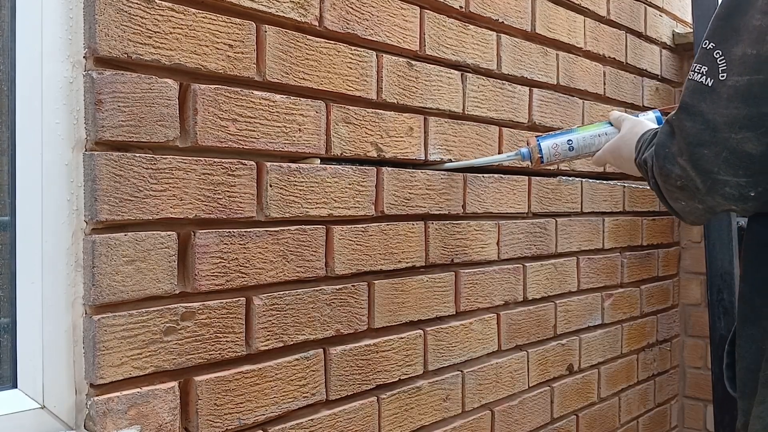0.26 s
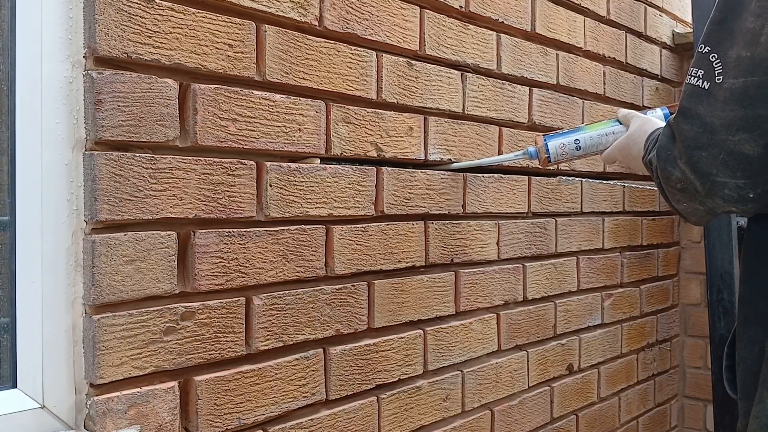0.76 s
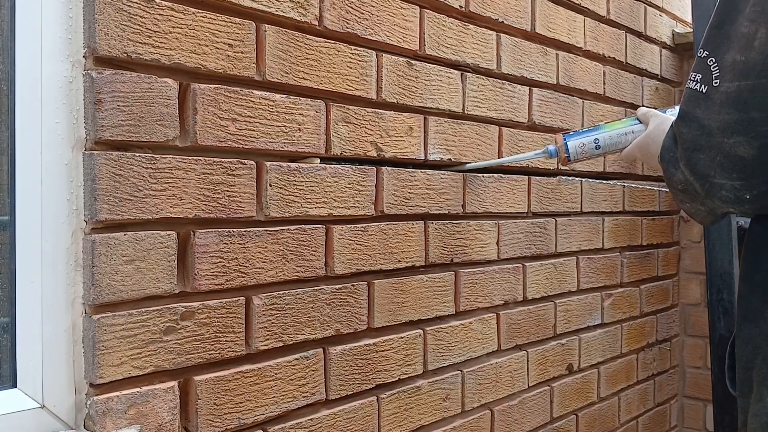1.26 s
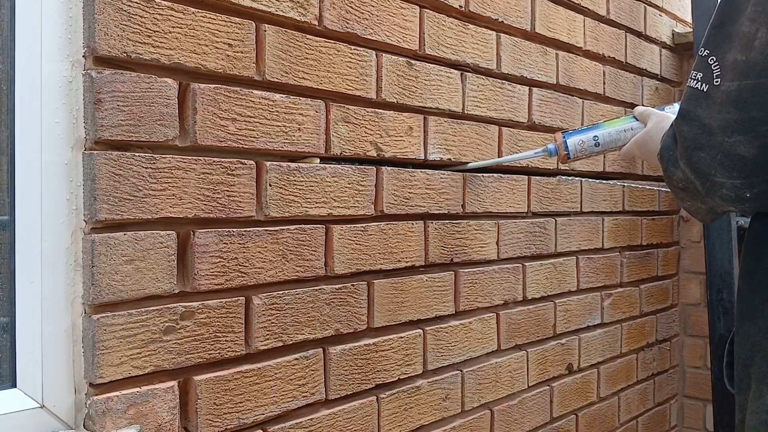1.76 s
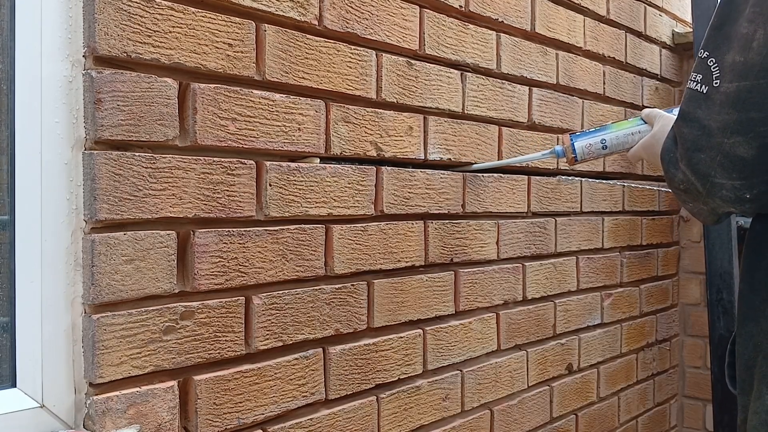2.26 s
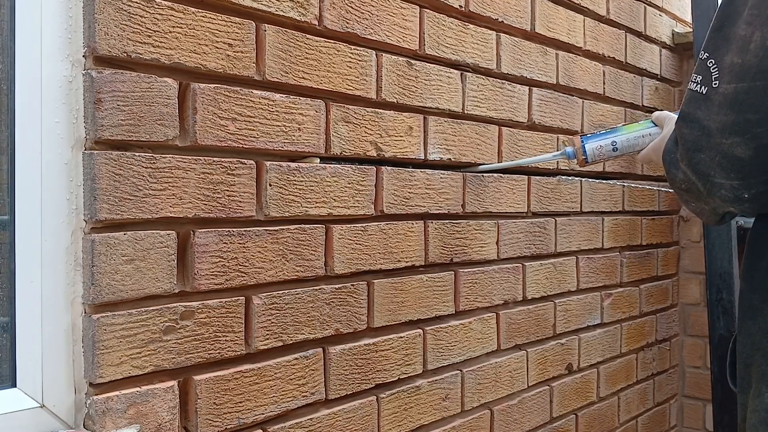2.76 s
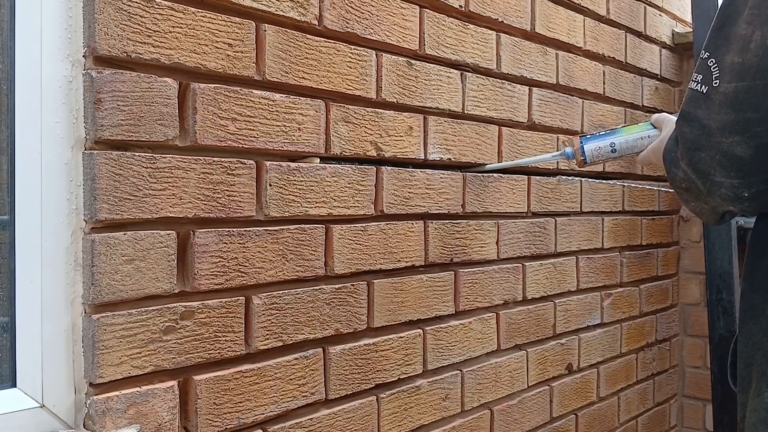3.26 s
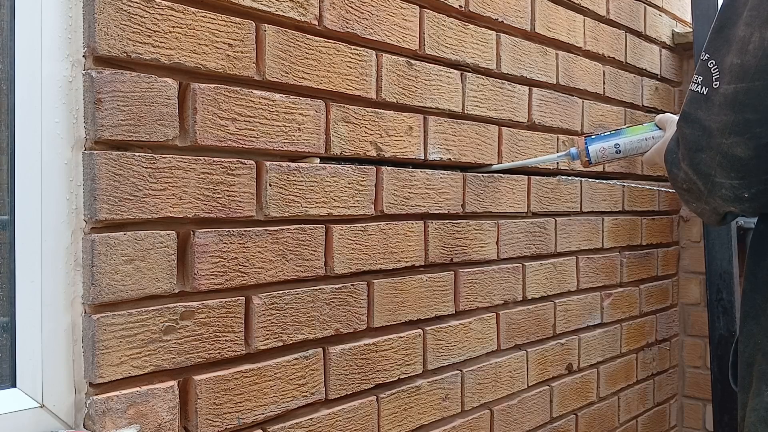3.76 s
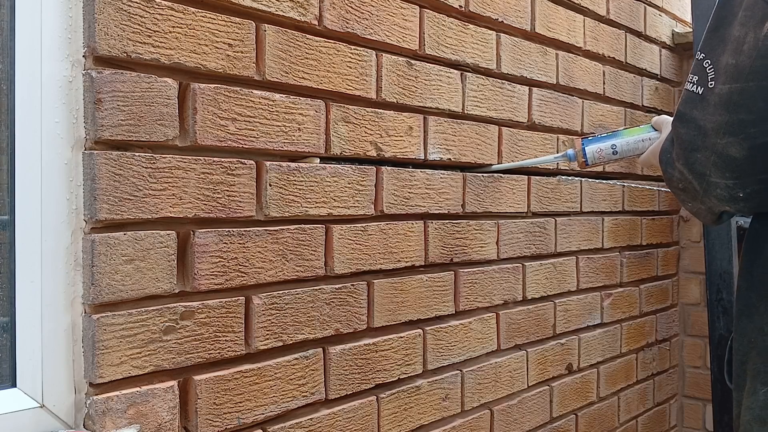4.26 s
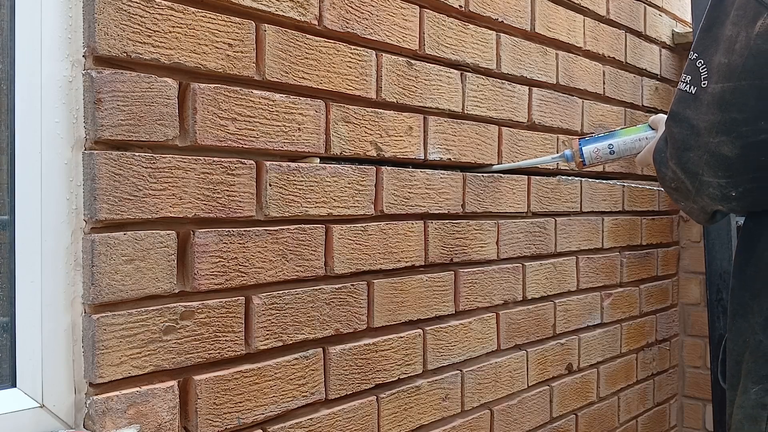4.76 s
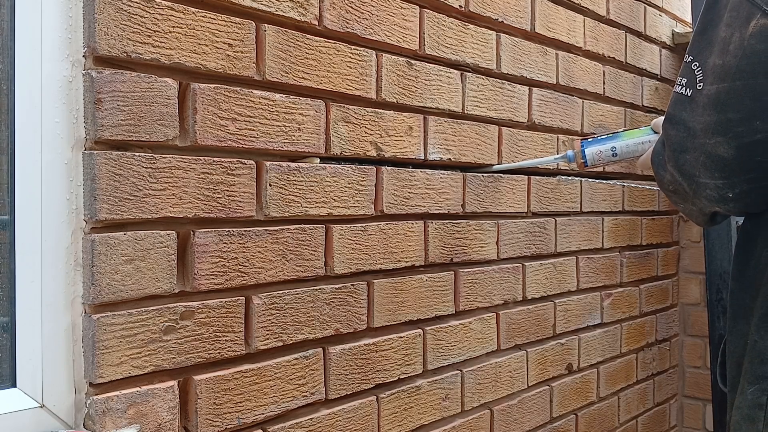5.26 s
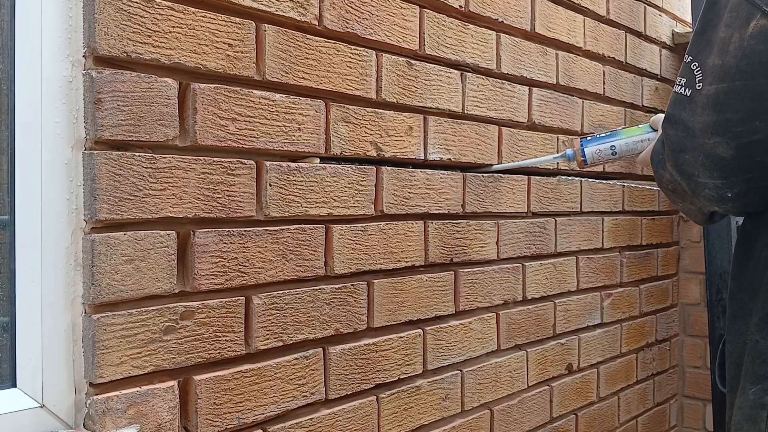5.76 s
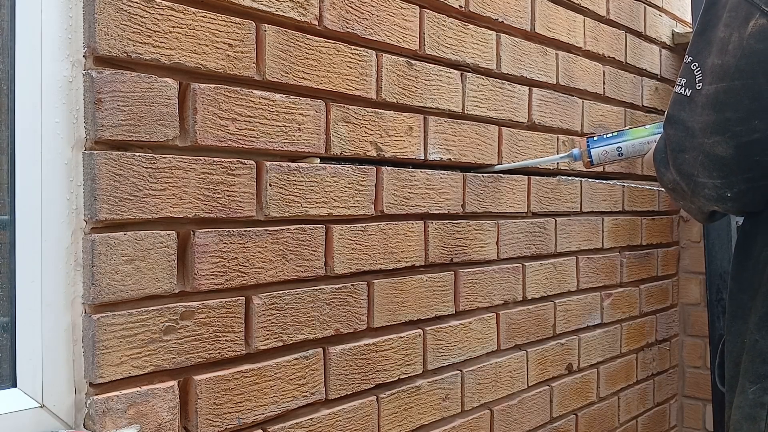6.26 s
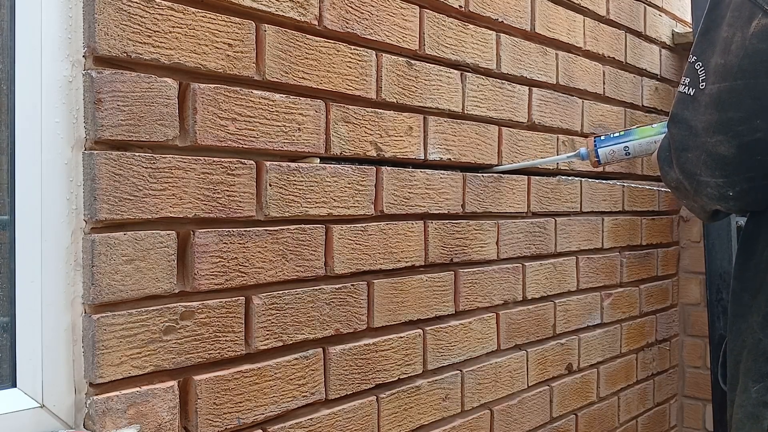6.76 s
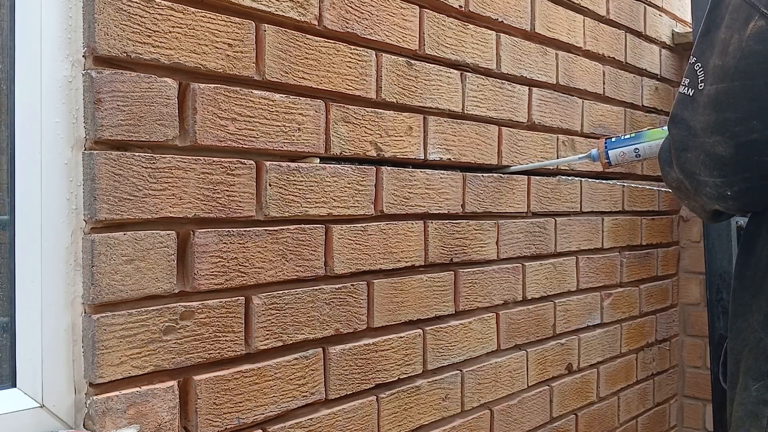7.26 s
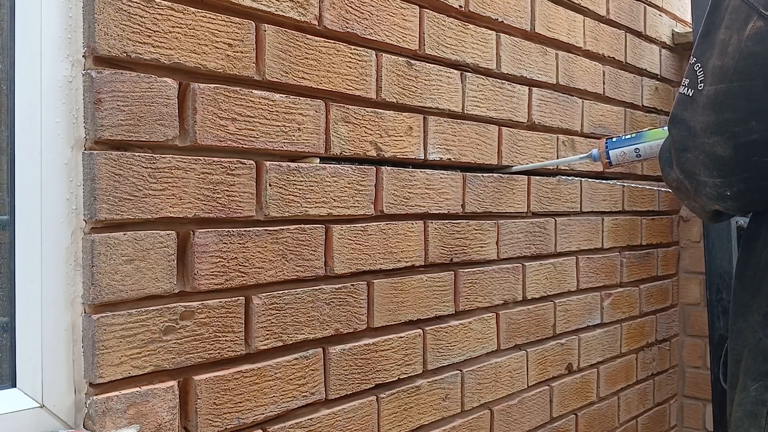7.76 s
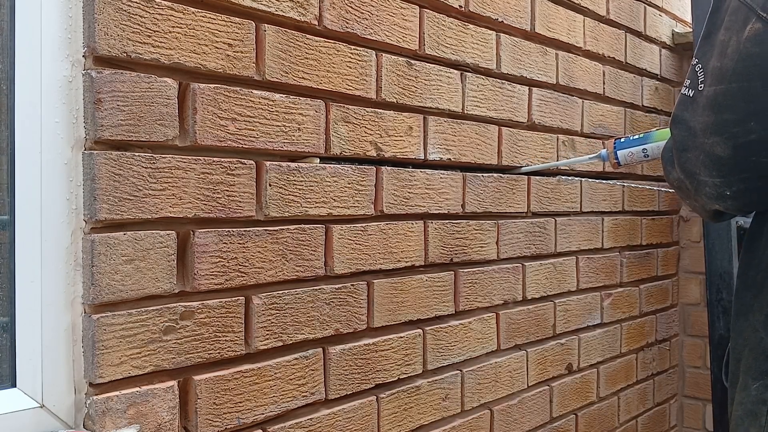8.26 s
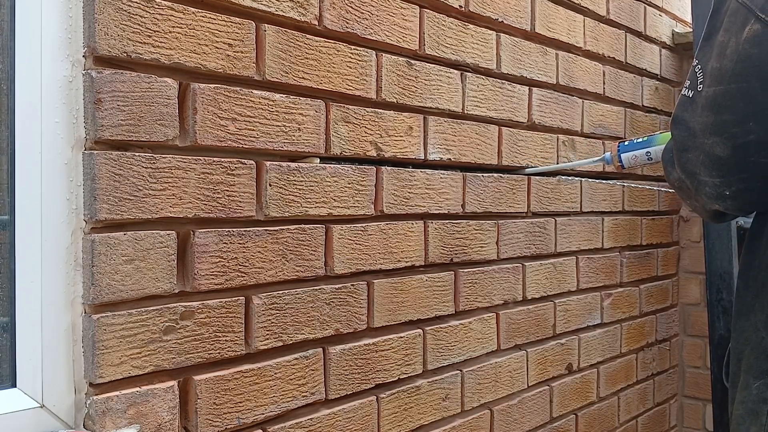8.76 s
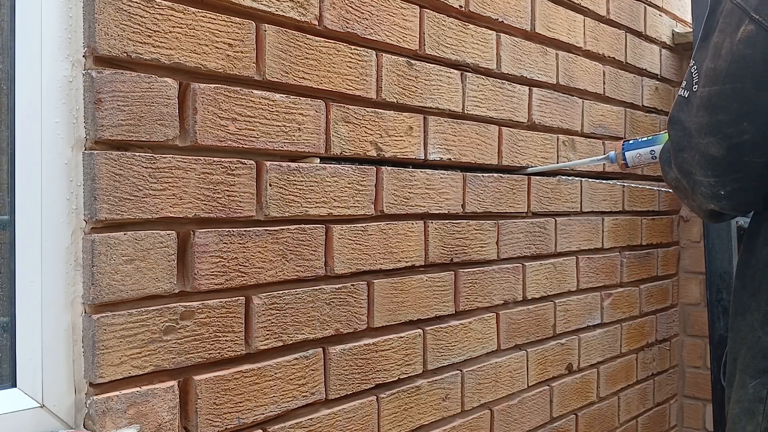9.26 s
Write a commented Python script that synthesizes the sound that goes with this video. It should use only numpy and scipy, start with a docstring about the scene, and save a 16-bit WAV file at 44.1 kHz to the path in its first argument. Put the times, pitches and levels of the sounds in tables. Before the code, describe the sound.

Outdoors in a narrow brick passage, a steel cartridge gun is pumped close to the microphone, over quiet dull traffic, treble hiss and low wind. A bright snap starts at 0 s, with small ticks after it. Around 1.4 s a hollow double knock and a rattling cluster of clacks come, then ticks at 1.6. A softer scrape and snap follow at 2.9, and a fainter one at 3.8; a distant engine hums low between about 2 and 5.5 s. The hardest clack hits at 4.8 s, with a second at 4.9, echoing off the walls. At 6.2 a rough scrape runs into lighter snaps. Low wind thumps gather from 6.6 to 7.5, with a sleeve brush at 7.1. Strong snaps with hollow knocks come at 7.6 and 9.1, the last after a scrape. Thin faint squeaks sound near 1, 2, 4.2 and 6 s. The background is quieter after 7.8 s.

```python
"""In a narrow brick passage outdoors, a steel cartridge gun is pumped along a mortar joint.
About every 1.5 s the trigger is let go: the cartridge knocks hollowly (damped sines), the grip plate scrapes
back along the rod (uneven noise) and snaps home (resonant noise bursts), and the walls throw the snap back.
Between strokes come small ticks, faint crackles, a thin squeak and sleeve brushes (filtered noise), over
far traffic, hiss and wind (diffuse noise), low thumps and a distant engine (wavering sines)."""
import sys
import numpy as np
from scipy import signal
from scipy.fft import rfft, irfft
from scipy.io import wavfile

SR = 44100
rng = np.random.default_rng(int(sys.argv[2]) if len(sys.argv) > 2 else 0)


def persist_wave(psi):
    """Save psi, clipped to +-1, as 16-bit WAV."""
    counts = np.round(np.clip(psi, -1, 1) * 32767).astype(np.int16)
    wavfile.write(sys.argv[1], SR, np.atleast_2d(counts).T)


N = 419832
TIME = np.arange(N) / SR
EVENT_SIZE = 2 ** 15   # samples in the buffer of one short event


def from_db(db):
    """Level law: decibels to amplitude gain."""
    return 10 ** (np.asarray(db) / 20)


def lean_right(db):
    """Level stereo: the left side loses and the right side gains this many decibels."""
    return from_db([[-db], [db]])


def rms_one(x):
    """Normalisation by mean power: scale to rms 1."""
    return x / np.sqrt(np.mean(x ** 2) + 1e-20)


def bins(size):
    """Fourier analysis: frequencies in Hz of a spectrum of this many samples, none below 1."""
    return np.maximum(np.arange(size // 2 + 1) * SR / size, 1)


def at_hz(points, hz):
    """Logarithmic pitch scale: read a table by straight lines over log frequency."""
    points = np.array(points)
    return np.interp(np.log(hz), np.log(points[:, 0]), points[:, 1])


def in_time(rows):
    """Linear interpolation: one curve over time for each column after the first."""
    s, *columns = np.transpose(rows)
    return [np.interp(TIME, s, column) for column in columns]


def flicker(per_s, size):
    """Random modulation: straight lines between independent normal values, per_s of them a second."""
    steps = np.arange(size) * per_s / SR
    count = int(steps[-1]) + 2
    return np.interp(steps, np.arange(count), rng.standard_normal(count))


def coloured(gain, size, grain_db=0):
    """Linear filtering: stereo noise of uneven tiny impulses through a frequency response."""
    unevenness = from_db(grain_db * np.clip(rng.standard_normal(size), -2, 2))
    grains = rng.standard_normal((2, size)) * unevenness
    return irfft(rfft(rms_one(grains)) * gain, size)


def resonance(hz, centre_hz, width_hz, level_db):
    """Damped resonance: power that one mode adds to the broad response."""
    return (from_db(level_db) ** 2 - 1) / (1 + (2 * (hz - centre_hz) / width_hz) ** 2)


def dying(t, t60):
    """Exponential decay: falls 60 dB in t60 seconds."""
    return from_db(-60 * t / t60)


def add(out, s, sound):
    """Superposition: mix a sound in at time s, cut to the length of the scene."""
    start = int(round(s * SR))
    first, last = max(start, 0), min(start + sound.shape[-1], N)
    out[:, first:last] += sound[:, first - start:last - start]


# Left-right likeness of the background. Each row: frequency in Hz, correlation from -1 to 1.
LIKENESS_BY_HZ = [(60, 0.61), (130, 0.55), (290, 0.65), (640, .09), (1400, -.15), (3100, 0.081)]


def air(spectrum, pan_db):
    """Diffuse field: noise whose two sides are mostly alike only in the bass; rms 1."""
    hz = bins(N)
    alike = np.clip(at_hz(LIKENESS_BY_HZ, hz), -1, 1)
    mid, side = rfft(rng.standard_normal((2, N))) * from_db(at_hz(spectrum, hz))
    # these weights give the two sides the tabled correlation
    pair = irfft(np.sqrt(1 + alike) * mid + np.sqrt(1 - alike) * side * [[1], [-1]], N)
    return rms_one(pair * lean_right(pan_db))


# Colour of far traffic. Each row: frequency in Hz, gain in dB.
TRAFFIC_COLOUR = [(100, -9), (170, -2), (260, 1), (430, -2), (950, -1.5), (1400, -5), (2000, -13.5),
                  (3800, -18.5), (5500, -24.5), (7500, -32), (16000, -39)]
# Strength of far traffic. Each row: time in seconds, level in dB before the common gain.
TRAFFIC_LEVEL = [(0.0, -61.5), (0.4, -64.5), (3.98, -64.5), (5.67, -68.5), (7.48, -66.5), (7.95, -74.5),
                 (9.25, -71), (9.52, -72.5)]


def traffic(gain_db=3.0, waver_db=0.698):
    """Propagation loss: far traffic reaches the passage as a dull, slowly varying diffuse noise."""
    level_db, = in_time(TRAFFIC_LEVEL)
    level_db = level_db + gain_db + waver_db * flicker(22, N)
    return from_db(level_db) * air(TRAFFIC_COLOUR, pan_db=2.0)


# Colour of the microphone's hiss. Each row: frequency in Hz, gain in dB.
HISS_COLOUR = [(3000, -24.5), (6500, -24), (8200, -19), (9200, -10), (10500, -4), (13000, -1),
               (15500, -1.5)]
# Hiss and crackles drop late on and stay low. Each row: time in seconds, change of level in dB.
LATE_LULL = [(7.6, 0), (7.85, -6.5)]


def hiss(level_db=-69.5, waver_db=1.03):
    """Self-noise: the microphone's own random noise, strongest in the high treble."""
    lull_db, = in_time(LATE_LULL)
    return from_db(level_db + lull_db + waver_db * flicker(14, N)) * air(HISS_COLOUR, pan_db=1.0)


# Colour of the wind. Each row: frequency in Hz, gain in dB.
WIND_COLOUR = [(20, -38), (33, -26.5), (45, -10.5), (62, -2), (75, 4), (97, -1), (130, -16.5), (200, -30),
               (500, -58.5)]
# Strength of the steady wind under the thumps. Each row: time in seconds, level in dB.
BREEZE_LEVEL = [(0, -62.5), (1.2, -67.5), (1.9, -61.5), (4.0, -65.5), (4.6, -60.5), (5.85, -66.5),
                (6.6, -60), (7.6, -59), (7.85, -73), (9.52, -71)]


def wind(gust_db=2.0, gusts_per_s=9):
    """Turbulence: a low rumble whose level wavers at random in gusts."""
    breeze_db, = in_time(BREEZE_LEVEL)
    return from_db(breeze_db + gust_db * flicker(gusts_per_s, N)) * air(WIND_COLOUR, pan_db=0.6)


# A distant engine pulls up, eases off and runs on.
# Each row: time in seconds, mean pitch in Hz, rms level in dB before the common gain.
ENGINE_COURSE = [(0, 44.1, -77), (1.85, 55, -63), (2.15, 54.85, -51), (2.65, 56.96, -56), (2.84, 57.4, -76),
                 (2.96, 56.9, -59.5), (3.62, 62, -54), (3.8, 61.8, -80), (4.9, 63, -62), (5.6, 59.94, -69),
                 (5.9, 61, -87)]


def engine(gain_db=-2, waver_hz=1.2, spread_rad=0.65):
    """Frequency modulation: a wavering low tone whose phase wanders between the sides."""
    pitch_hz, level_db = in_time(ENGINE_COURSE)
    phase = 2 * np.pi * np.cumsum(pitch_hz + waver_hz * flicker(4.8, N)) / SR
    sides = np.sin(phase + spread_rad * flicker(2.3, N) * [[1], [-1]])
    return from_db(level_db + gain_db) * np.sqrt(2) * sides


# Low thumps: puffs of wind on the microphone, and the gun jolting the wall at 7.54 and 9.1 s.
# Each row: start in seconds, peak level of the tone in dB before panning, mean pitch in Hz.
LOW_THUMPS = [(0.0, -56, 80), (.79, -55, 78), (1.82, -52, 61), (2.26, -45.5, 70.4), (3.59, -55, 69.5),
              (4.81, -53, 80.5), (6.2, -52, 76.6), (6.635, -43.5, 68), (7.055, -45.5, 73), (7.12, -47, 75),
              (7.295, -47.5, 77), (7.535, -42, 80.7), (7.955, -53, 72), (8.255, -57, 62), (8.83, -54.5, 68),
              (9.1, -50, 71)]


def thumps(rise_s=0.022, spread_rad=0.44, pan_db=1.5, waver_hz=6, rush_db=-11, rush_low_hz=55, rush_high_hz=130):
    """Pressure pulse: a few low cycles swell and die, a little out of step, with a dull rush around them."""
    out, t, hz = np.zeros((2, N)), np.arange(EVENT_SIZE) / SR, bins(EVENT_SIZE)
    swell = t / rise_s * np.exp(1 - t / rise_s)   # peaks at 1 after rise_s
    rush_colour = 1 / (1 + (rush_low_hz / hz) ** 3) / (1 + (hz / rush_high_hz) ** 4)
    for s, db, pitch_hz in LOW_THUMPS:
        phase = 2 * np.pi * np.cumsum(pitch_hz + waver_hz * flicker(45, EVENT_SIZE)) / SR
        tone = np.sin(phase + spread_rad * rng.standard_normal() * np.array([[1], [-1]]))
        rush = from_db(rush_db) * rms_one(coloured(rush_colour, EVENT_SIZE))
        add(out, s, from_db(db) * swell * (tone + rush) * lean_right(pan_db))
    return out


# A sleeve brushes as the arm moves on. Each row: loudest moment in seconds, level there in dB.
SLEEVE_BRUSHES = [(7.14, -63.5), (8.54, -71), (8.96, -68)]


def sleeve(half_s=0.038, low_hz=220, high_hz=1300):
    """Soft friction: band-limited cloth noise that swells and fades with each move of the arm."""
    hz = bins(N)
    cloth = rms_one(coloured(1 / (1 + (low_hz / hz) ** 2) / (1 + (hz / high_hz) ** 2), N))
    swells = sum(from_db(db) * np.exp(-((TIME - s) / half_s) ** 2) for s, db in SLEEVE_BRUSHES)
    return cloth * swells


def crackles(per_s=7, level_db=-69.5, t60=0.14, spread_db=2.5, low_hz=9000):
    """Poisson process: faint bright crackles of the loaded gun come at random and die quickly."""
    lull_db, = in_time(LATE_LULL)
    strength = from_db(spread_db * np.clip(rng.standard_normal(N), -2, 2))
    births = (rng.random(N) < per_s / SR) * strength
    # the tiny offset keeps the decay above vanishing numbers
    envelope = signal.lfilter([1], [1, -dying(1 / SR, t60)], births + 1e-18)
    grains = rms_one(coloured(1 / (1 + (low_hz / bins(N)) ** 4), N, grain_db=4))
    return from_db(level_db + lull_db) * envelope * grains


# A thin squeak while the paste is under pressure.
# Each row: middle in seconds, half length (to 1/e) in seconds, level in dB, pitch in Hz.
PLUNGER_SQUEAKS = [(1.052, .2, -78, 4150), (2.053, 0.4, -75.5, 3980), (4.18, 0.31, -72, 3890),
                   (6.09, 0.13, -72.5, 3890)]


def squeaks(width_hz=420):
    """Friction-driven resonance: the plunger creeps down the tube and rubs one mode."""
    out, hz = np.zeros((2, N)), bins(EVENT_SIZE)
    t = (np.arange(EVENT_SIZE) - EVENT_SIZE / 2) / SR
    for s, half_s, db, pitch_hz in PLUNGER_SQUEAKS:
        mode = 1 / np.sqrt(1 + (2 * (hz - pitch_hz) / width_hz) ** 2)
        rubbing = rms_one(coloured(mode / (1 + (hz / 6000) ** 6), EVENT_SIZE))
        add(out, s + t[0], from_db(db) * np.exp(-(t / half_s) ** 2) * rubbing)
    return out


# Resonances of the steel frame. Each row: frequency in Hz, width in Hz, prominence in dB.
STEEL_FRAME = [(860, 43, 11), (1011, 78, 12.5), (1700, 560, 3), (2617, 80, 6.5), (2946, 63, 6.5),
               (3850, 190, 3.5), (4300, 210, 4), (4704, 110, 4), (5370, 180, 5), (6050, 150, 7),
               (7400, 250, 3.5), (9020, 90, 2.5), (9200, 190, 5), (9860, 46, 6), (10050, 50, 5),
               (10700, 70, 6.5), (11700, 170, 5.5), (12120, 320, 5.5), (12950, 200, 5.5), (14000, 270, 8.5),
               (15000, 190, 6.5), (15380, 170, 7)]


def frame_modes(hz):
    """Modal superposition: added power of all the frame's modes."""
    return np.maximum(sum(resonance(hz, *mode) for mode in STEEL_FRAME), 0)


# Broad colour of the scrape. Each row: frequency in Hz, gain in dB.
SCRAPE_COLOUR = [(200, -10.5), (1000, -4.5), (2200, -9), (4000, 0.5), (7000, -3), (10000, -1.5),
                 (16000, -7)]
# Plate and spring sliding on the rod.
# Each row: fastest moment in seconds, build-up time in seconds, level in dB before flicker and panning.
ROD_SLIDES = [(.44, 0.046, -69.5), (1.41, 0.014, -56), (1.79, 0.055, -64), (2.20, 0.028, -66.5),
              (2.935, 0.037, -52.5), (3.05, 0.016, -64), (3.775, 0.04, -58), (4.08, 0.072, -73),
              (5.32, 0.047, -63), (5.384, .01, -67.5), (5.555, 0.018, -64.5), (6.181, 0.0071, -42.5),
              (6.45, .04, -71), (7.11, 0.016, -74), (7.555, 0.019, -58), (8.54, .05, -72.5),
              (8.891, 0.015, -69), (8.953, 0.029, -52.5), (9.03, 0.0077, -59.5)]


def slides(fade_t60=0.36, pan_db=2.0):
    """Stick-slip friction: dense uneven slips of dry steel swell with speed and fade between the walls."""
    hz, power = bins(N), 0
    for s, build_s, db in ROD_SLIDES:
        build = np.exp(-np.clip((s - TIME) / build_s, 0, 20))
        fade = dying(np.clip(TIME - s, 0, 1), fade_t60)
        power = power + (from_db(db) * build * fade) ** 2
    colour = from_db(at_hz(SCRAPE_COLOUR, hz)) * np.sqrt(1 + .5 * frame_modes(hz))
    rubbing = rms_one(coloured(colour, N, grain_db=7.5))
    return np.sqrt(power) * rubbing * from_db(3.0 * flicker(220, N)) * lean_right(pan_db)


def passage(t, walls_db, late_db, build_s=0.018, walls_t60=0.3, late_t60=0.6):
    """Reverberation: reflections pile up between the walls, then a faint late tail is left."""
    near = from_db(walls_db) * (1 - np.exp(-t / build_s)) * dying(t, walls_t60)
    return np.hypot(near, from_db(late_db) * dying(t, late_t60))


# The cartridge knocking in its cradle.
# Each row: start in seconds, level in dB before the common gain, pitch in Hz, 60 dB decay time in seconds.
CARTRIDGE_KNOCKS = [(1.382, -48.5, 1116, 0.034), (1.426, -40.5, 1100, 0.087), (2.424, -55.5, 938, 0.2),
                    (2.860, -42.5, 1110, 0.027), (3.735, -42.5, 1077, 0.024), (4.742, -55, 1560, 0.055),
                    (4.805, -24.5, 1030, 0.013), (7.586, -41.5, 984, 0.049), (9.108, -45.5, 952, 0.077)]


def knocks(upper_t60=0.037, width_hz=170, upper_ratio=1.3, upper_db=-10, gain_db=4.5):
    """Free vibration: the hollow plastic tube rings briefly at two pitches, and the walls answer."""
    out, t, hz = np.zeros((2, N)), np.arange(EVENT_SIZE) / SR, bins(EVENT_SIZE)
    attack = 1 - np.exp(-t / 0.00031)
    walls = passage(t, walls_db=-12.0, late_db=-44.5)
    for s, db, pitch_hz, t60 in CARTRIDGE_KNOCKS:
        phase = 2 * np.pi * pitch_hz * t
        lower = np.sin(phase) * dying(t, t60)
        upper = from_db(upper_db) * np.sin(upper_ratio * phase) * dying(t, upper_t60)
        power = resonance(hz, pitch_hz, width_hz, 21) + resonance(hz, upper_ratio * pitch_hz, width_hz, 4)
        echoes = rms_one(coloured(np.sqrt(power) / (1 + (hz / 1700) ** 8), EVENT_SIZE))
        add(out, s, from_db(db + gain_db) * ((lower + upper) * attack + echoes * walls))
    return out


# The grip plate snaps along the rod; two resonances that differ from snap to snap colour crack and echoes.
# Each row: start in seconds, level in dB, treble gain in dB, echo gain in dB, lower resonance in Hz,
# upper resonance in Hz, prominence of both in dB.
PLATE_SNAPS = [(-.002, -27, 5.5, -5, 2300, 5700, 9), (1.388, -53.5, 2, -2, 9000, 11500, 8),
               (1.415, -35, -19, -3.5, 1580, 2300, 14.5), (1.428, -28.5, -3.5, -3, 5750, 9050, 8.5),
               (1.445, -33.5, 0.5, -6.5, 5050, 7150, 9), (1.453, -28, -4.5, -16.5, 1570, 5070, 12),
               (2.942, -38, -6, -2, 6140, 7560, 10.5), (3.770, -46.5, 2.5, 1, 4730, 6100, 6),
               (3.798, -46.5, 1, -7.5, 6750, 8700, 11), (4.807, -33, -8, -3.5, 500, 4300, 7.5),
               (4.8153, -15.3, 2, -4, 2855, 4700, 10), (4.830, -23, 6.5, -10, 3775, 4096, 14),
               (4.917, -24, 3.5, -9, 3730, 9070, 14.5), (6.159, -36, -12.5, 0.5, 1605, 3280, 6.5),
               (6.191, -37, -8, -10, 3310, 8800, 12), (6.210, -34.5, 1.5, -9, 4970, 8700, 7),
               (7.5864, -19.5, 5, -3.5, 4250, 7150, 6.5), (9.1076, -26.5, 7.5, -1, 2650, 7280, 10.5)]
# Lighter ticks as trigger and rod settle under load, each coloured by one resonance.
# Each row: start in seconds, level in dB, resonance in Hz.
SETTLING_TICKS = [(.115, -49.5, 3440), (.270, -44, 9040), (1.563, -42, 3500), (1.628, -44.5, 5200),
                  (2.42, -51, 5600), (3.113, -46, 7100), (3.249, -55.5, 4350), (3.968, -55, 6550),
                  (4.427, -49.5, 3300), (5.066, -52, 7420), (5.297, -54.5, 5000), (7.564, -48, 3480)]


def contacts(tick_treble_db=-12.5, tick_echo_db=-4.5, tick_peak_db=10.5):
    """Impact excitation: snaps and ticks alike as start, level, treble, echo, resonances, prominence."""
    hits = []
    for s, db, treble_db, echo_db, lower_hz, upper_hz, peak_db in PLATE_SNAPS:
        hits.append((s, db, treble_db, echo_db, [lower_hz, upper_hz], peak_db))
    for s, db, centre_hz in SETTLING_TICKS:
        hits.append((s, db, tick_treble_db, tick_echo_db, [centre_hz], tick_peak_db))
    return hits


# Broad colour of steel on steel. Each row: frequency in Hz, gain in dB.
STEEL_COLOUR = [(120, -16.5), (350, -1), (650, -10), (900, -8.5), (1400, -0.5), (2200, -2.5), (3300, -1),
                (5500, -0.5), (8200, 0.5), (11000, 1), (16000, -3.5)]


def snaps(rise_s=0.0011, crack_t60=0.053, peak_width_hz=240, ring_db=-20, ring_t60=0.68, ring_growth=0.05,
          ripple_db=3.5, air_loss_db_per_s=25, direct_pan_db=2.5, walls_pan_db=0.3):
    """Impact and modal decay: short coloured steel chatter; echoes follow and the frame's modes ring on."""
    out, t, hz = np.zeros((2, N)), np.arange(EVENT_SIZE) / SR, bins(EVENT_SIZE)
    bass, treble = 1 / (1 + (hz / 2100) ** 4), 1 / (1 + (7000 / hz) ** 4)
    frame, attack = frame_modes(hz), 1 - np.exp(-t / rise_s)
    walls = passage(t, walls_db=0, late_db=-33)
    ripple_hz = np.arange(256) * SR / 512
    for s, db, treble_db, echo_db, centres_hz, peak_db in contacts():
        # the many weak modes between the main ones are struck unevenly
        ripple = np.interp(hz, ripple_hz, np.minimum(rng.standard_normal(256), 1))
        # a harder contact is shorter and so thinner
        bass_db = -5.5 - 0.3 * (db + 30)
        broad_db = at_hz(STEEL_COLOUR, hz) + bass_db * bass + treble_db * treble + ripple_db * ripple
        broad = from_db(broad_db)
        peaks = sum(resonance(hz, centre_hz, peak_width_hz, peak_db) for centre_hz in centres_hz)
        colour = broad * np.sqrt(1 + np.maximum(frame + peaks, 0))

        chatter = from_db(0.81 * flicker(980, EVENT_SIZE))
        crack = coloured(colour, EVENT_SIZE, grain_db=0.63) * chatter * dying(t, crack_t60)

        # air and rough brick take the treble out of the echoes first
        dull = coloured(colour * np.sqrt(1 - treble), EVENT_SIZE)
        bright = coloured(colour * np.sqrt(treble), EVENT_SIZE, grain_db=2.5)
        bright = bright * from_db(-air_loss_db_per_s * t)
        echoes = (dull + bright) * from_db(1.2 * flicker(345, EVENT_SIZE) + echo_db) * walls

        # only the sharp tops of the frame's modes last, the high ones weaker, a little more after hard snaps
        tops = broad * frame / np.sqrt(1 + frame) / (1 + (hz / 6000) ** 2)
        ring_gain = from_db(ring_db + ring_growth * (db + 25))
        ring = coloured(tops, EVENT_SIZE) * ring_gain * dying(t, ring_t60)

        sound = crack * lean_right(direct_pan_db) + (echoes + ring) * lean_right(walls_pan_db)
        add(out, s, from_db(db) * attack * sound)
    return out


def scene():
    """Superposition: the gun over the outdoor background."""
    background = traffic() + hiss() + wind() + engine() + thumps()
    gun = crackles() + squeaks() + slides() + knocks() + snaps()
    return background + sleeve() + gun


def record(dry, cutoff_hz=15900):
    """Band limitation: a steep elliptic low-pass cuts the top."""
    low_pass = signal.ellip(12, .1, 80, cutoff_hz, fs=SR, output="sos")   # 0.1 dB ripple, 80 dB stop
    return signal.sosfilt(low_pass, dry)


dry = scene()
out = record(dry)
persist_wave(out)
```